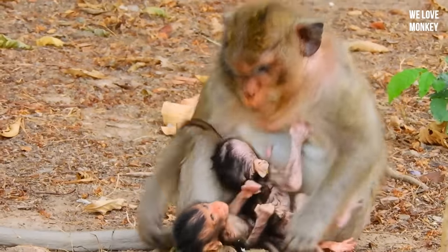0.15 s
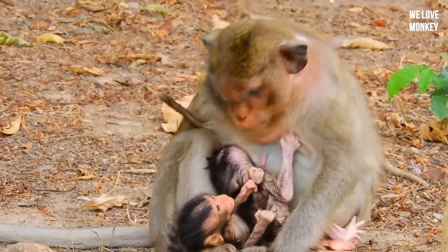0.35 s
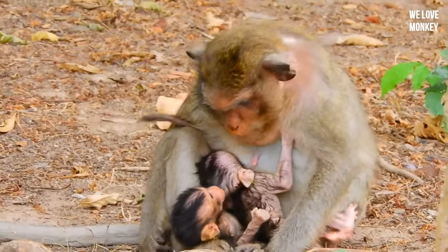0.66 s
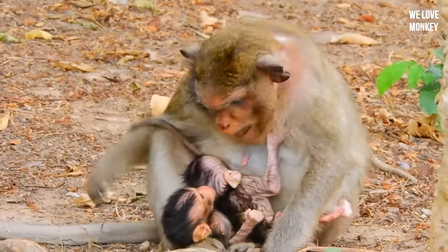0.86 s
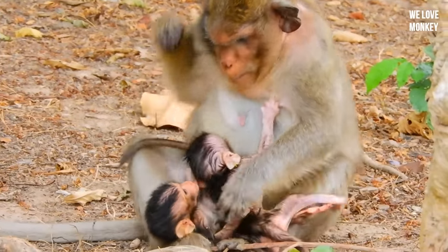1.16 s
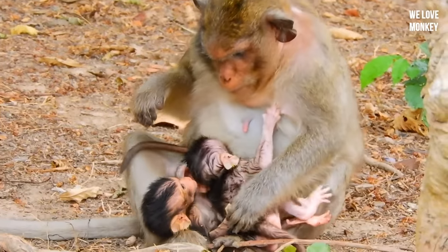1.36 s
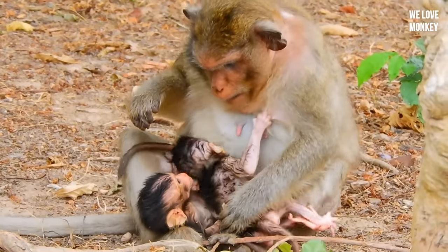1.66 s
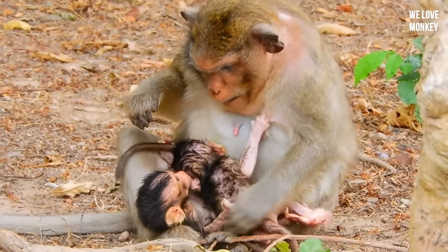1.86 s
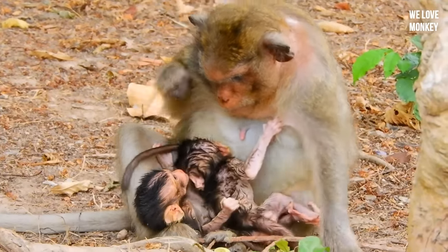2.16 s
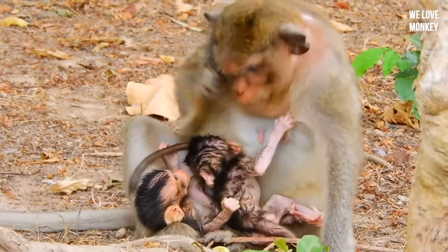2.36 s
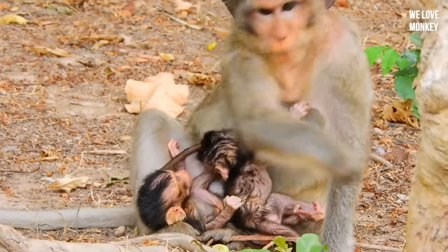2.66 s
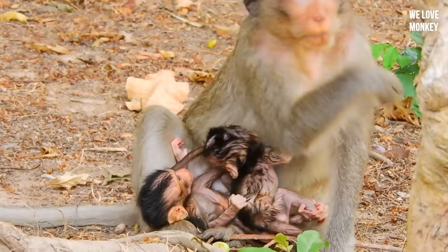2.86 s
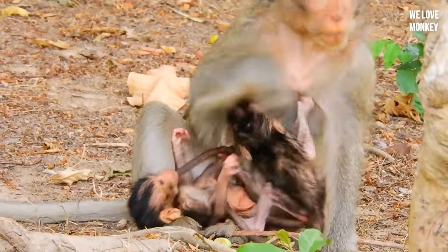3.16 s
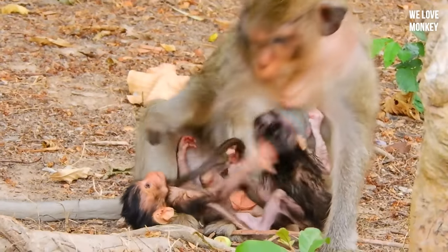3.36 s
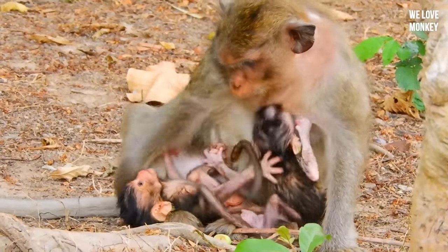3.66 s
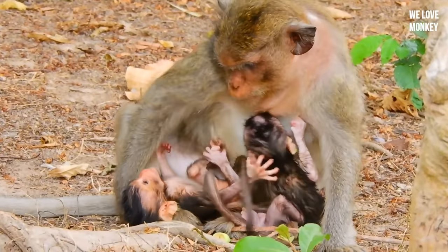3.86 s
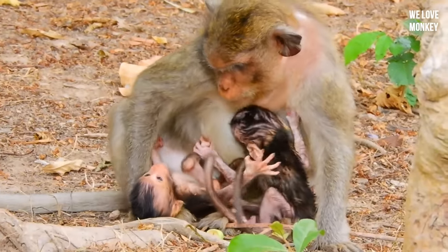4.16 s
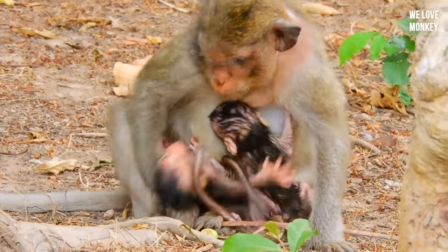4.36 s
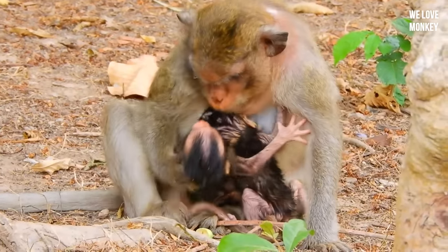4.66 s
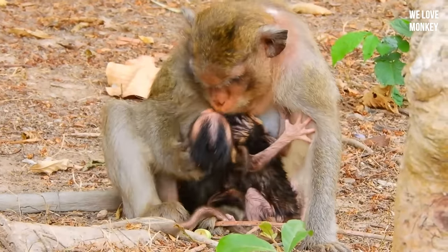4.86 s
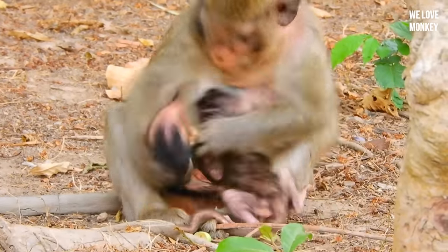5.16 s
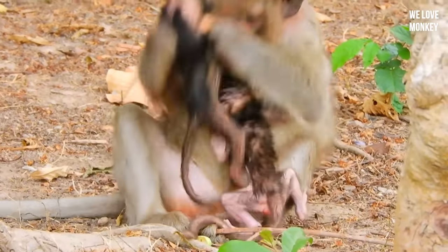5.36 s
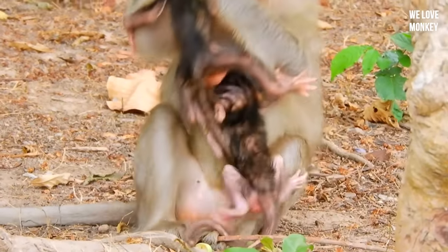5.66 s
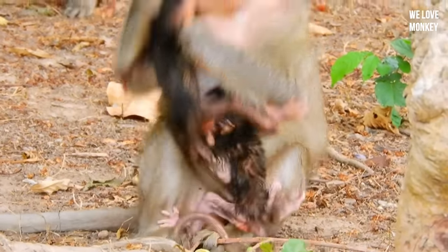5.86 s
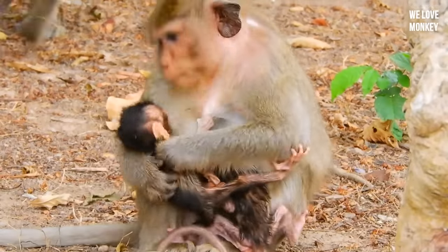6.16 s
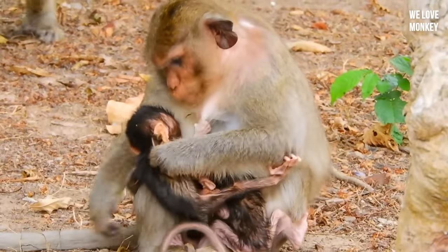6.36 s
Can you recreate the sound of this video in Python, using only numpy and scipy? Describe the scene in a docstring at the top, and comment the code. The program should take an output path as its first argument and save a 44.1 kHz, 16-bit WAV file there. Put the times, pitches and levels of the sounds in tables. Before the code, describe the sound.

A low rumble of wind with a steady hum and soft hiss runs throughout, outdoors under trees. Right at the start, a newborn monkey close to the microphone gives one thin, very high scream, about a quarter second long, whistling and then breaking into rasp. From about 0.7 to 1.6 seconds a faint, thin call sounds four times far away, while a leaf ticks and a soft crack comes nearby. Between 2.8 and 4 seconds the baby makes a run of about seven very short, high, raspy squeaks, loudest near 3 seconds. From 4.5 to 6 seconds dry leaves snap, crumble and lightly rustle as the mother shifts, with the sharpest snap at 5.1 seconds. Around 5.4 seconds the baby gives a brief falling whine that swells and roughens. The cries sit just left of centre with a short echo. Wind continues to the end, around 6.5 seconds.

```python
"""A newborn monkey protests close to a stereo microphone, handled by its mother on dry leaves under trees.
Its whistling voice breaks into rasp when forced: one thin scream, a run of short squeaks and a falling
whine, each glancing off the ground and echoing among the trunks. Leaves snap and crumble under the pair.
Far off in the wood a faint call sounds four times. Under it all lies a low rumble of wind with a
100 Hz hum, perhaps a distant engine."""
import sys
import numpy as np
from scipy import signal
from scipy.fft import rfft, irfft, next_fast_len
from scipy.io import wavfile

SR = 44100
rng = np.random.default_rng(int(sys.argv[2]) if len(sys.argv) > 2 else 0)


def to_wav(sig):
    """Store sig (one row per channel, or 1-D mono) as 16-bit WAV at the path in sys.argv[1].

    Samples outside -1..1 are clipped; the rate is SR.
    """
    pcm = np.clip(np.atleast_2d(sig), -1, 1) * 32767
    pcm = np.round(pcm).astype(np.int16)
    wavfile.write(sys.argv[1], SR, pcm.T)  # frames by channels


N = 287091
TIME = np.arange(N) / SR

# colour of the rasp for each shape of the mouth: f/Hz, spectral level/dB
MOUTH_TIGHT = [(2060, -74.5), (3500, -44.5), (3900, -54.5), (5310, -22), (7480, -17), (8910, -5),
               (9900, -2), (12500, -25), (15500, -46)]
MOUTH_OPEN = [(1650, -61.5), (2800, -17), (3890, -25), (4590, 13.5), (5220, 1), (6950, 7), (7630, 1),
              (9390, 0.5), (15500, -30)]
MOUTH_NARROW = [(1760, -67), (3000, -38), (4750, -3.5), (6610, -22), (7530, -8), (9850, 4.5), (11000, -4),
                (12800, -24), (15500, -39)]
MOUTH_WIDE = [(1120, -72), (1900, -56), (3080, -10), (6060, -1.5), (6610, -8), (7610, -4.5), (12200, -17),
              (14200, -35), (15500, -41)]
MOUTH_GRIN = [(2300, -41), (3000, -11.5), (4300, -7.5), (6500, -16), (8000, 3.5), (10000, -17),
              (13000, -38), (15500, -23)]
# each shape of the mouth by name: colour of the rasp, lowest radiated f/Hz
MOUTHS = {"tight": (MOUTH_TIGHT, 1100), "open": (MOUTH_OPEN, 4730), "narrow": (MOUTH_NARROW, 2500),
          "wide": (MOUTH_WIDE, 2040), "grin": (MOUTH_GRIN, 2960)}
RATTLE_HZ, RATTLE_DEPTH, BUZZ_HZ = 1073, 0.617, 3912

def monkey_voice(times, hz, db, rough, mouth, octave_db, pan_db, buzz_db, jitter):
    """Vocal folds whistle, and break into rasp as they are forced."""
    colour, lowest_hz = MOUTHS[mouth]
    edge_s = 0.0024
    sounding = (TIME > times[0] - edge_s) & (TIME < times[-1] + edge_s)
    t = TIME[sounding]
    size = len(t)
    hz, db, rough = (np.interp(t, times, column) for column in (hz, db, np.clip(rough, 0, .98)))
    # the pitch always trembles a little; rough folds lose it from cycle to cycle
    hz = hz * (1 + 0.0064 * wobble(200, size) + jitter * rough * wobble(790, size))
    phase = 2 * np.pi * np.cumsum(hz) / SR
    # the octave fades as it climbs past what the mouth radiates
    overtone = from_db(octave_db) * np.sin(2 * phase) / (1 + (2 * hz / 12500) ** 10)
    whistle = np.sqrt(2 * (1 - rough ** 2)) * (np.sin(phase) + overtone)
    # an uneven rattle of the folds chops the whistle
    rattle = 2 * np.pi * np.cumsum(RATTLE_HZ * (1 + 0.24 * wobble(150, size))) / SR
    depth = RATTLE_DEPTH * rough
    chopped = whistle * (1 + depth * np.cos(rattle)) / np.sqrt(1 + depth ** 2 / 2)
    voice = chopped + rough * noise(colour, size)
    # a second vibration in the throat puts side lines around the whistle
    buzz = 2 * np.pi * BUZZ_HZ * t
    voice *= 1 + from_db(buzz_db) * (np.cos(buzz) + 0.22 * np.cos(2 * buzz))
    # the air flow sputters, the small mouth cuts the lows, and a little dull air noise goes with it
    voice *= from_db((0.04 + 3.0 * rough) * wobble(350, size) - rough)
    voice = signal.sosfilt(signal.butter(8, lowest_hz, "high", fs=SR, output="sos"), voice)
    voice += from_db(-37) * noise([(400, -1), (3500, -2)], size)
    fade = np.clip(np.minimum(t - t[0], t[-1] - t) / edge_s, 0, 1)
    out = np.zeros(N)
    out[sounding] = voice * from_db(db) * fade
    return place(out, pan_db)


# course of the two long cries: t/s, f/Hz, level/dB
SCREAM = [(0.003, 8117, -30), (0.011, 8600, -18), (0.035, 9220, -6.5), (0.057, 9180, -28),
          (0.065, 9312, -18.5), (0.125, 10480, -24.5), (0.161, 11120, -29), (0.219, 10350, -26.5),
          (0.231, 9540, -22.5), (0.245, 9540, -24.5), (0.25, 9400, -44)]
WHINE = [(5.36, 6305, -60), (5.368, 6260, -49), (5.398, 5760, -53), (5.416, 7291, -34.5),
         (5.454, 6830, -26), (5.46, 6719, -20.5), (5.478, 5805, -18), (5.52, 4630, -16.5),
         (5.536, 4710, -15)]
# each starts clear, then the voice breaks: t/s, roughness/0-1
SCREAM_BREAK = [(.039, .04), (.046, 0.39), (.21, 0.78), (.235, 0.56)]
WHINE_BREAK = [(5.456, 0.15), (5.49, 0.66), (5.526, 0.37)]
# short squeaks, some in two quick parts:
# t/s, length/s, peak/share of length, first f/Hz, last f/Hz, level/dB, roughness/0-1, octave/dB, mouth
SQUEAKS = [(2.827, 0.0058, .25, 6200, 5080, -30.5, 0.11, -30, "narrow"),
           (2.968, 0.038, 0.93, 5460, 4433, -6.5, 0.63, -7, "open"),
           (3.152, .062, 0.63, 10900, 4510, -15.5, 0.94, -19, "narrow"),
           (3.364, 0.022, 0.37, 3730, 3820, -26.5, 0.14, -32, "wide"),
           (3.373, 0.025, 0.34, 6800, 3785, -16, 0.59, -30, "wide"),
           (3.588, 0.023, 0.75, 8140, 7400, -16, 0.77, -26, "wide"),
           (3.608, 0.025, 0.35, 8700, 3680, -12.5, 0.72, -30, "wide"),
           (3.777, 0.022, 0.9, 8500, 8150, -15, 0.58, -25, "grin"),
           (3.804, 0.02, 0.18, 8000, 7070, -10.5, 0.99, -17, "grin"),
           (4.02, 0.0097, 1, 3300, 2735, -30, 0.33, -28, "wide"),
           (4.028, 0.009, 0.11, 6200, 3830, -19, 0.34, -24, "wide")]

def baby_monkey():
    """The newborn, close and just left of centre, screams, squeaks and whines."""
    scream = monkey_voice(*cry_contour(SCREAM, SCREAM_BREAK, gain_db=-0.63), "tight",
                          octave_db=-34.5, pan_db=0.9, buzz_db=-21, jitter=0.041)
    whine = monkey_voice(*cry_contour(WHINE, WHINE_BREAK, gain_db=0.8), "open",
                         octave_db=-15.5, pan_db=2.0, buzz_db=-20, jitter=0.075)
    return scream + sum(squeak(*row) for row in SQUEAKS) + whine


def cry_contour(course, breaking, gain_db, release_s=0.01, release_db=2.5):
    """Times, pitch, level and roughness of a long cry, which fades at its very end."""
    times, hz, db = np.transpose(course)
    t = TIME[(TIME >= times[0]) & (TIME <= times[-1])]
    release = np.maximum(1 - (times[-1] - t) / release_s, 0)
    level_db = np.interp(t, times, db) + gain_db - release_db * release
    return t, np.interp(t, times, hz), level_db, np.interp(t, *np.transpose(breaking))


def squeak(start, length, peak_at, first_hz, last_hz, db, rough, octave_db, mouth):
    """One push of air: it swells and fades while the pitch glides, mostly down, and the rasp eases."""
    part = np.linspace(0, 1, 100)
    peak_at = np.clip(peak_at, .05, .95)
    glide = part ** 1.7   # holds at first, then moves ever faster
    hz = first_hz + (last_hz - first_hz) * glide
    swell_db = 13.5 * np.maximum(1 - part / peak_at, 0) ** 1.1
    fade_db = 9 * np.maximum((part - peak_at) / (1 - peak_at), 0) ** 0.72
    return monkey_voice(start + length * part, hz, db - swell_db - fade_db, rough * (1 - 0.42 * glide),
                        mouth, octave_db, pan_db=1.3, buzz_db=-24.5, jitter=0.071)


# leaves and stalks giving way under the pair: t/s, snap level/dB, crumble level/dB
CRACKLES = [(.668, -33, -65), (4.502, -48, -32), (4.612, -27.5, -53), (4.686, -44, -44),
            (4.749, -46, -41.5), (4.882, -34, -50), (4.959, -33, -69), (5.102, -20, -31), (5.369, -44, -42),
            (5.928, -35, -50), (5.997, -54, -36)]
# colour of dry leaves at close range: f/Hz, spectral level/dB
DRY_LEAVES = [(1180, -53.5), (2000, -17.5), (3340, -21), (4960, -8.5), (6250, -9.5), (8880, 0),
              (10000, -5.5), (15500, -43)]

def leaf_crackles(snap_t60_s=0.0046, crumble_t60_s=0.2):
    """Each leaf gives way with a sharp snap and a longer crumble."""
    snaps = [(start, db, snap_t60_s) for start, db, _ in CRACKLES]
    crumbles = [(start, db, crumble_t60_s) for start, _, db in CRACKLES]
    return bursts(snaps + crumbles, DRY_LEAVES, attack_s=.0004, grain_db=2)


def leaf_rustle():
    """The litter crackles finely, louder once the mother shifts her weight."""
    moving = np.interp(TIME, [4.2, 4.6], [.1, 1])
    grains = noise(DRY_LEAVES, N) * from_db(4 * wobble(120, N))
    return from_db(-59.5) * moving * rms_one(grains)


def faint_crack():
    """A faint, soft crack, perhaps a twig."""
    return bursts([(.938, -48, 0.08)], [(2500, 0), (6300, 0)], attack_s=0.005, grain_db=3)


def ground_bounce(x, delays_s=(.00225, .00228)):
    """The ground adds a close reflection, a little later on the right, that beats against fast glides."""
    echo = [np.interp(TIME - delay, TIME, channel, left=0) for delay, channel in zip(delays_s, x)]
    return .93 * (x + .38 * np.array(echo))


def tree_echo(x, wood_t60_s=0.48, early_t60_s=0.12):
    """Trunks and ground scatter a dense, uneven echo with a softened top, different on each side."""
    t = TIME[:int(.8 * SR)]
    low_pass = signal.butter(2, 11000, fs=SR, output="sos")
    decay = from_db(-60 * t / wood_t60_s) + 0.55 * from_db(-60 * t / early_t60_s)
    onset = np.clip(t / .004 - 1, 0, 1)
    out = []
    for channel in x:
        scatter = rng.standard_normal(len(t)) * from_db(4.1 * wobble(200, len(t)))
        echo = signal.sosfilt(low_pass, scatter * decay * onset)
        out.append(signal.fftconvolve(channel, echo / np.linalg.norm(echo))[:N])
    return np.array(out)


# calls from deep in the wood: t/s, length/s, first f/Hz, last f/Hz, level/dB
FAR_CALLS = [(0.698, 0.14, 3540, 3600, -64), (0.94, 0.2, 3682, 3615, -59), (1.219, 0.17, 3520, 3410, -58),
             (1.493, 0.13, 3666, 3460, -59)]

def far_calls():
    """Thin, wavering, slightly arched notes with their octave, far from the microphone."""
    out = np.zeros(N)
    for start, length, first_hz, last_hz, db in FAR_CALLS:
        part = np.clip((TIME - start) / length, 0, 1)
        arch = 4 * part * (1 - part)
        hz = (first_hz + (last_hz - first_hz) * part) * (1 + 0.0081 * arch + 0.0066 * wobble(77.6, N))
        phase = 2 * np.pi * np.cumsum(hz) / SR
        out += from_db(db + 2.2 * wobble(49, N)) * np.sqrt(arch) * (np.sin(phase) + np.sin(2 * phase))
    return out


# swell of the wind: t/s, level/dB
GUSTS = [(0.2, -4), (1.2, 0), (3.7, .5), (4.4, -0.5), (5.5, 1.5), (6.5, -0.5)]
# low rumble of wind with a steady 100 Hz hum, perhaps a distant engine: f/Hz, spectral level/dB
RUMBLE_AND_HUM = [(22, -29), (50, -5.5), (88, -3), (100, 3), (113, -5), (180, -14), (250, -24), (400, -39)]
# wind brushing each side of the microphone on its own, and the hiss of the air: f/Hz, spectral level/dB
BUFFET = [(22, -2), (45, 1), (90, -6.5)]
AIR = [(300, -5.5), (450, -10), (720, -12.5), (920, -10.5), (1150, -16), (2300, -18.5), (4200, -18.5),
       (5200, -15), (7200, -20), (9000, -20), (11000, -29.5), (14800, -36.5)]

def wind_and_hum():
    """Low wind with a 100 Hz hum, perhaps a distant engine, swells gently with the hiss of the air."""
    gust_db = np.interp(TIME, *np.transpose(GUSTS))
    rumble = from_db(gust_db - 38.5) * stereo_noise(RUMBLE_AND_HUM, width=0.127)
    buffet = from_db(gust_db - 62) * np.array([noise(BUFFET, N), noise(BUFFET, N)])
    air = from_db(0.84 * gust_db - 54.5) * stereo_noise(AIR, width=0.718)
    return rumble + buffet + air


def stereo_noise(spectrum, width):
    """Steady noise, partly shared between left and right."""
    return noise(spectrum, N) + width * noise(spectrum, N) * np.array([[1], [-1]])


def bursts(rows, colour, attack_s, grain_db):
    """Grainy noise that starts quickly and dies away; rows are t/s, level/dB, T60/s."""
    level = np.zeros(N)
    for start, db, t60 in rows:
        age = np.clip(TIME - start, 0, 1)
        level += from_db(db - 60 * age / t60) * np.minimum(age / attack_s, 1)
    return level * rms_one(noise(colour, N) * from_db(grain_db * wobble(410, N)))


def noise(spectrum, size):
    """Noise of a given colour, falling 20 dB an octave beyond its ends; rms about 1."""
    hz, db = np.transpose(spectrum)
    length = next_fast_len(max(size, SR // 4))
    octave = np.log2(np.maximum(np.fft.rfftfreq(length, 1 / SR), 1))
    beyond = np.abs(octave - np.clip(octave, np.log2(hz[0]), np.log2(hz[-1])))
    gain = from_db(np.interp(octave, np.log2(hz), db) - 20 * beyond)
    return rms_one(irfft(rfft(rng.standard_normal(length)) * gain, length))[:size]


def wobble(rate_hz, size):
    """Random wavering up to a given rate; spread about 1."""
    sos = signal.butter(2, rate_hz, fs=SR, output="sos")
    return rms_one(signal.sosfilt(sos, rng.standard_normal(size + SR // 4)))[-size:]


def place(x, pan_db):
    """Mono to stereo, left minus right in dB."""
    return x * from_db(np.array([[1], [-1]]) * pan_db / 2)


def from_db(db):
    """Decibels to gain."""
    return 10 ** (np.asarray(db) / 20)


def rms_one(x):
    """Scale to unit power."""
    return x / np.sqrt(np.mean(x ** 2) + 1e-20)


def scene():
    """The monkeys close to the microphone, the wood around them."""
    forest_floor = leaf_crackles() + leaf_rustle() + faint_crack()
    direct = ground_bounce(baby_monkey()) + place(forest_floor, pan_db=3.0)
    far = far_calls()
    background = wind_and_hum()
    echo = from_db(-11.5) * tree_echo(direct + from_db(10.0) * far)   # far calls carry more echo
    return direct + echo + far + background


def record(dry, cutoff_hz=15800):
    """The microphone's signal, with the top cut steeply."""
    return signal.sosfilt(signal.ellip(10, .1, 80, cutoff_hz, fs=SR, output="sos"), dry)


dry = scene()
out = record(dry)
to_wav(out)
```